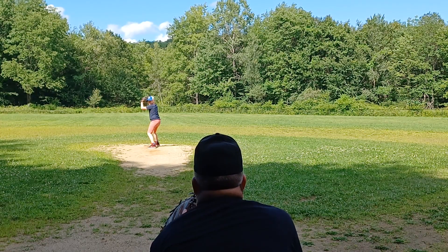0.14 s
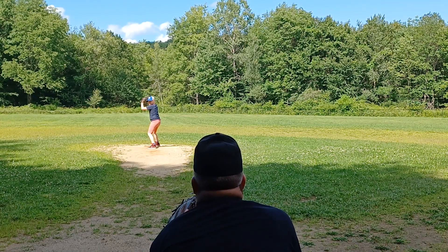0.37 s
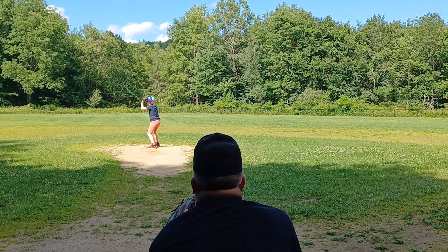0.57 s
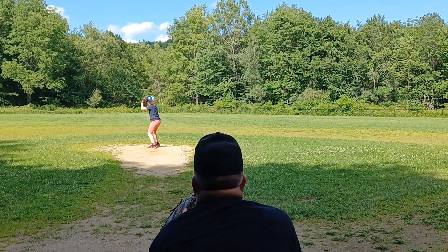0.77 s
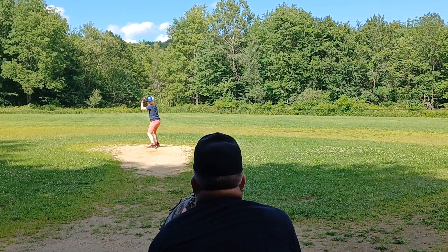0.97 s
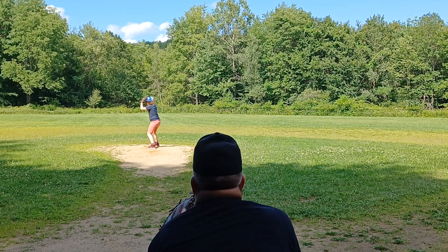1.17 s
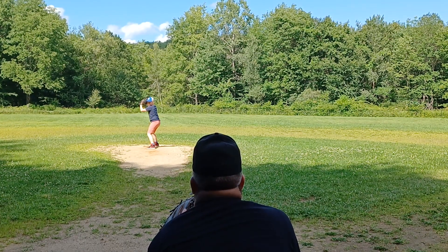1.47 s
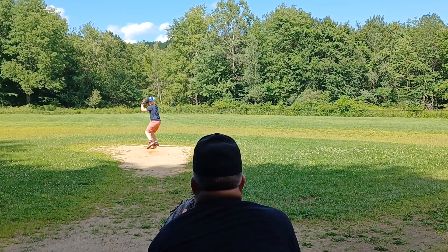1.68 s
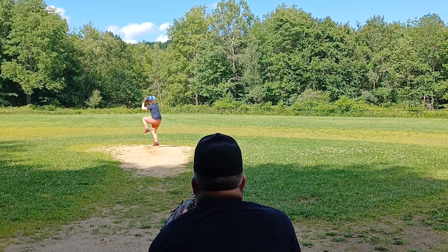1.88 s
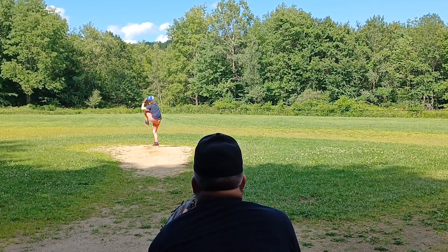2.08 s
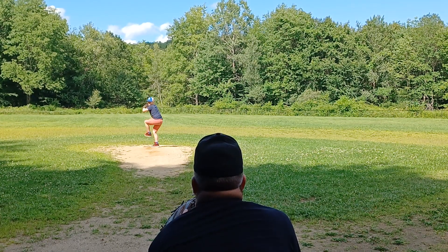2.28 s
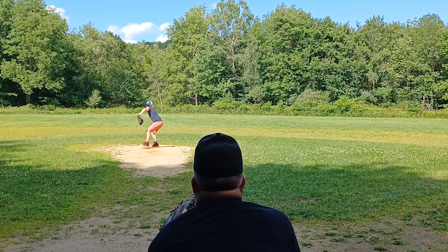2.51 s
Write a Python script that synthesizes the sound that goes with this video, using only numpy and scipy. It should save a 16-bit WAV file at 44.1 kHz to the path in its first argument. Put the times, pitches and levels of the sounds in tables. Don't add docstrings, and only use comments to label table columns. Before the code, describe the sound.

Quiet outdoor field with wind thumping gently on the microphone, one close fabric scrape early, then soft brushing, two tiny bird ticks on the right, far traffic hum and thin insect hiss from trees.

```python
import sys
import numpy as np
from scipy import signal
from scipy.fft import rfft, irfft, next_fast_len
from scipy.io import wavfile
from scipy.ndimage import uniform_filter1d

SR = 44100
rng = np.random.default_rng(int(sys.argv[2]) if len(sys.argv) > 2 else 0)


def volts_from_db(level):
    exponent = np.asarray(level, float) / 20
    return 10 ** exponent


def generate_wav(sig):
    pcm = np.round(np.clip(np.atleast_2d(sig).T, -1, 1) * 32767).astype(np.int16)
    wavfile.write(sys.argv[1], SR, pcm)


N = 116865
T = np.arange(N) / SR
FFT_LEN = next_fast_len(N)
F = np.maximum(np.fft.rfftfreq(FFT_LEN, 1 / SR), 1)


def on_hz(table, column):
    points = np.array(table)
    return np.interp(np.log(F), np.log(points[:, 0]), points[:, column])


def to_time(spec):
    return irfft(spec, FFT_LEN)[:, :N]


def walk(rate_hz):
    hold = max(int(SR / rate_hz), 1)
    steps = np.repeat(rng.standard_normal(N)[:N // hold + 1], hold)
    slewed = uniform_filter1d(uniform_filter1d(steps, hold), hold)
    return 1.42 * slewed[:N]


def pair(alike, lag_s=0., envelope=1):
    same, left, right = rfft(rng.standard_normal((3, N)) * envelope, FFT_LEN)
    share = np.clip(alike, 0, 1)
    arrival = np.array([np.exp(-2j * np.pi * F * lag_s), np.ones_like(F)])
    return np.sqrt(share) * same * arrival + np.sqrt(1 - share) * np.array([left, right])


def colour(spec, table):
    skirt = np.minimum(F / table[0][0], 1) ** 4 * np.minimum(table[-1][0] / F, 1) ** 4
    sides_db = np.array([on_hz(table, 1), on_hz(table, 2)])
    return spec * volts_from_db(sides_db) * skirt * np.sqrt(SR / 2)


def flicker(spec, lo_hz, hi_hz, slow_db, quick_db):
    swell = walk(2.2)
    octave = np.log2(np.clip(F, lo_hz, hi_hz) / lo_hz)
    out = 0
    for k in range(int(np.ceil(octave.max())) + 1):
        band = to_time(spec * np.maximum(1 - abs(octave - k), 0))
        out = out + band * volts_from_db(slow_db * swell + quick_db * walk(8.92))
    return out


def swells(rows):
    out = 0
    for start_s, end_s, rise_s, fall_s, db in rows:
        flank = np.maximum(start_s - T, 0) / rise_s + np.maximum(T - end_s, 0) / fall_s
        out = out + volts_from_db(db) * np.exp(-.5 * flank ** 2)
    return out


def wind():
    # start in s, end in s, level in dB, extra level of the upper resonances in dB,
    # pitch of the main resonance in Hz.
    gusts = [(0, 0.305, -68, 0, 87), (0.327, 0.504, -81, 6, 99.5), (0.784, 0.963, -67, 1.5, 85),
             (0.96, 1.117, -61, 2.5, 82.4), (1.123, 1.189, -59, -1.5, 103.3), (1.29, 1.345, -75, 5, 99.3),
             (1.343, 1.427, -66, 9.5, 104), (1.546, 1.596, -63, 3, 95.5), (1.66, 1.78, -60.5, 0, 84.56),
             (1.8, 1.85, -64.5, -2, 88), (1.854, 1.96, -57, -2, 96.3), (1.988, 2.099, -60.5, -6.5, 90.5),
             (2.117, 2.199, -66, 4.5, 94.8), (2.427, 2.492, -58.5, -0.5, 94.2),
             (2.523, 2.629, -60, -1, 88.4)]
    # resonance in Hz, width in Hz, level in dB, upper share [0-1], steadiness [0-1].
    hollows = [(56.3, 41, -12.5, 0.1, 0.7), (87.15, 17, -3, 0.01, 0.9), (119.7, 35, -7.5, 0.6, 1),
               (203, 56, -12.5, 1.1, 0.7), (262.7, 60, -21.5, 0.98, 0.6)]
    edge_s, lull_db, main_hz = 0.012, -72.5, 88
    alike, pan_db, flutter_db = 0.95, 1.85, 1.3

    gates = []
    for start_s, end_s, *_ in gusts:
        opening = 1 / (1 + np.exp((start_s - T) / edge_s))
        gates.append(opening / (1 + np.exp((T - end_s) / edge_s)))
    bend = sum(gate * (row[4] / main_hz - 1) for gate, row in zip(gates, gusts))

    out = 0
    for hz, width_hz, db, upper, steady in hollows:
        ring = 2 / (1 + (2 * (F - hz) / width_hz) ** 2)
        tone = np.fft.ifft(pair(alike) * ring, FFT_LEN)[:, :N]
        bend_hz = np.clip(1 - upper, 0, 1) * hz * bend
        tone = tone * np.exp(2j * np.pi * np.cumsum(bend_hz) / SR)
        envelope = abs(tone.mean(axis=0)).clip(tone.std() / 2)
        drum = (tone / envelope ** np.clip(steady, 0, 1)).real
        level = volts_from_db(lull_db)
        for gate, row in zip(gates, gusts):
            level = level + gate * volts_from_db(row[2] + upper * row[3])
        out = out + drum / drum.std() * level * volts_from_db(db + flutter_db * walk(14))
    return out * volts_from_db(np.array([[.5], [-.5]]) * pan_db)


def rustles():
    # frequency in Hz, left level in dB per Hz, right level in dB per Hz.
    cloth_tone = [(1200, -112, -110), (2170, -100, -100), (2780, -109, -111), (3650, -106, -114),
                  (4670, -122, -111), (6100, -114, -114), (10100, -114, -113), (13500, -120, -116)]
    brush_tone = [(2600, -130, -130), (3560, -123, -121), (4140, -122, -110), (5100, -123, -117),
                  (5440, -124, -119), (6940, -134, -128)]
    # full from in s, full until in s, rise in s, fall in s, level in dB.
    cloth_moves = [
        (.13, 0.24, 0.033, 0.01, -4.5),
        (.18, 0.23, 0.016, 0.012, -8),
        (0.118, 0.115, 0.00087, .002, -1),
        (0.183, 0.183, 0.00072, 0.002, -6),
        (0.14, 0.2, .0008, .002, -10.5),
        (0.233, 0.229, .001, .003, -5),
        (0.28, 0.313, 0.027, 0.038, -10),
        (1.67, 1.7, 0.026, .03, -13),
    ]
    brush_moves = [
        (.81, 0.838, .008, 0.016, -1),
        (0.883, 0.94, 0.022, 0.049, 2),
        (1.03, 1.11, 0.025, .05, -6.5),
        (1.67, 1.78, .02, .03, -8.5),
        (2.6, 2.65, 0.037, .05, -15),
        (0.287, .35, .02, .03, -10.5),
        (0.12, 0.2, 0.0076, 0.014, 3),
    ]

    cloth_drive = swells(cloth_moves) * volts_from_db(1.46 * walk(200))
    brush_drive = swells(brush_moves) * volts_from_db(0.17 * walk(99))
    cloth = colour(pair(0.71, -.000053, cloth_drive), cloth_tone)
    brush = colour(pair(0.51, .0003, brush_drive), brush_tone)
    return to_time(cloth + brush)


def ticks():
    # time in s, pitch in Hz, length in s, right level in dB, left minus right in dB.
    calls = [
        (.812, 4810, 0.013, -83.5, -10),
        (2.387, 5280, 0.0016, -78, -12),
    ]
    bend = 1 + .008 * walk(300)
    out = 0
    for at_s, hz, length_s, db, pan_db in calls:
        tone = np.sin(2 * np.pi * hz * np.cumsum(bend) / SR)
        pulse = np.exp(-.5 * ((T - at_s) / length_s) ** 2)
        out = out + volts_from_db(db + np.array([[pan_db], [0]])) * pulse * tone
    return out


def road():
    # frequency in Hz, left level in dB per Hz, right level in dB per Hz,
    # share arriving from one side [0-1].
    tyres = [(57.3, -100, -101, 1), (200, -92.5, -94, 0.73), (385, -103, -105, 0.66),
             (666, -101, -102, 0.3), (938, -99, -95, 0.4), (1313, -99, -99, 0.61), (1862, -111, -103, .15),
             (2830, -124, -120, 0.041)]
    # time in s, level in dB.
    traffic = [(0, -74.5), (.25, -76), (.7, -77.5), (1.05, -77.5), (1.2, -77.5), (1.55, -76.5),
               (1.85, -78.5), (2.3, -77), (2.65, -79.5)]
    lag_s, ref_db = -0.0004, -77

    noise = colour(pair(on_hz(tyres, 3), lag_s), tyres)
    hum = flicker(noise, 84, 2500, slow_db=0.69, quick_db=0.77)
    return hum * volts_from_db(np.interp(T, *np.array(traffic).T) - ref_db)


def trees():
    # frequency in Hz, left level in dB per Hz, right level in dB per Hz.
    leaf_tone = [(1490, -120, -120), (2250, -117, -115), (3160, -121, -119), (4130, -126, -122),
                 (6950, -128, -126), (8300, -138, -138)]
    chorus_tone = [(5860, -140, -135), (7200, -127, -119), (7650, -123, -115), (8500, -124, -119),
                   (8950, -128, -122), (9070, -150, -150)]
    buzz_tone = [(6970, -132, -130), (7070, -121, -113), (7700, -124, -118), (8000, -123, -113),
                 (8400, -134, -128)]
    # full from in s, full until in s, rise in s, fall in s, level in dB.
    buzz_times = [
        (1.08, 1.27, .03, 0.049, -1),
        (2.295, 2.4, .012, 0.012, 2),
        (0.65, 0.91, .02, .02, -6),
    ]

    leaves = flicker(colour(pair(0.07), leaf_tone), 2000, 8700, slow_db=0.26, quick_db=1.0)
    chorus = colour(pair(0.021, envelope=volts_from_db(0.27 * walk(5.6))), chorus_tone)
    buzz = colour(pair(0.34, envelope=swells(buzz_times)), buzz_tone)
    return leaves + to_time(chorus + buzz)


def scene():
    return wind() + rustles() + ticks() + road() + trees()


def low_pass(x):
    return signal.sosfilt(signal.butter(12, 15720, fs=SR, output="sos"), x)


def record(dry):
    # frequency in Hz, left level in dB per Hz, right level in dB per Hz.
    hiss = [(2920, -132, -132), (10000, -131, -129), (11000, -129, -127), (12900, -125, -125),
            (15600, -128, -129)]
    port_hz, port_width_hz, port_db = 5203, 1380, 11
    low_cut_hz, top_hz = 45, 15800

    port = volts_from_db(port_db / (1 + (2 * (F - port_hz) / port_width_hz) ** 4))
    low_cut = 1 / np.sqrt(1 + (low_cut_hz / F) ** 8)
    spec = rfft(dry, FFT_LEN) * np.array([np.ones_like(F), port]) * low_cut
    spec = spec + colour(pair(0.012), hiss)
    return low_pass(to_time(spec * (F < top_hz)))


dry = scene()
out = record(dry)
generate_wav(out)
```